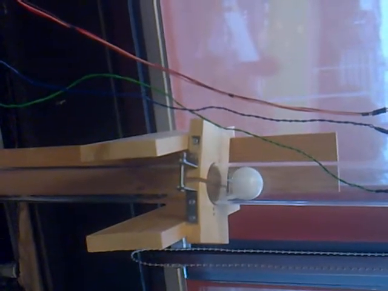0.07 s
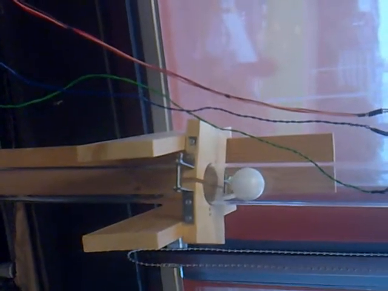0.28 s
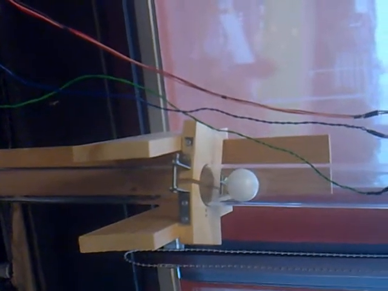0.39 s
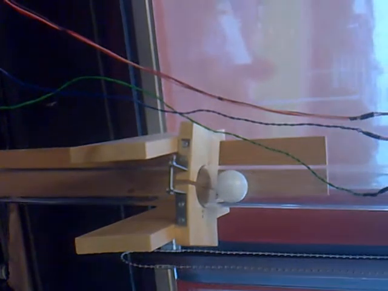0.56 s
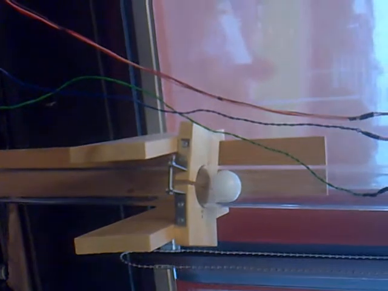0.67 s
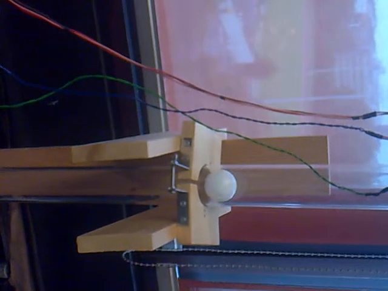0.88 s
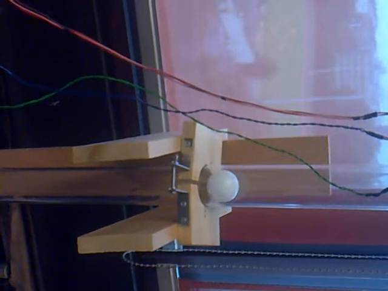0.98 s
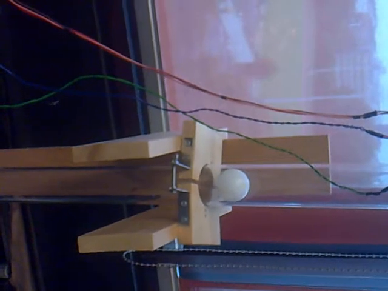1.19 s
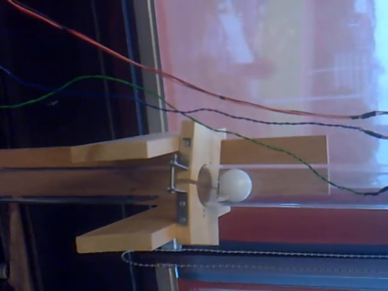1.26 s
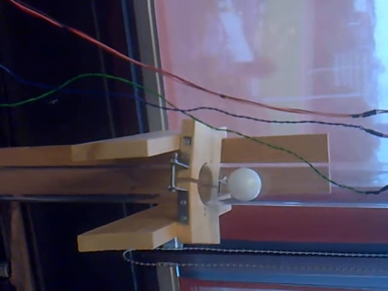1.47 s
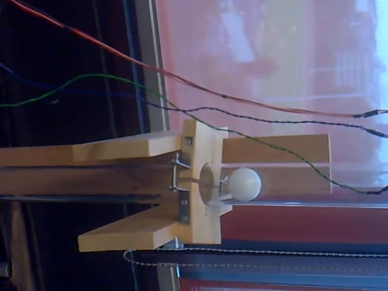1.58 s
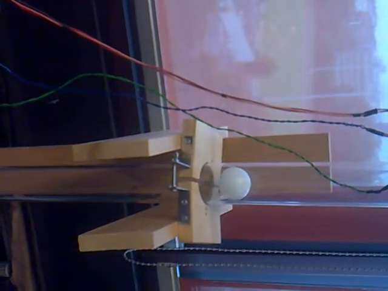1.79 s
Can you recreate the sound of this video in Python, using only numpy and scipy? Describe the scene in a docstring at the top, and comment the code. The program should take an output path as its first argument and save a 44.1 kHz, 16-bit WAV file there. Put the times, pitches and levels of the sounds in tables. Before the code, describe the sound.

Fading reverberation and faint quick ticks, then a strong rattling burst of hollow woody knocks, lighter taps, a second softer burst and two faint late taps; distant single microphone, reverberant room, low steady hiss.

```python
"""The dying reverberation of an earlier knock and a quick chatter come first, over a faint, drifting hiss.
A light hollow ball strikes a wooden end stop inside a tube, some way from the microphone.
Each knock is a short blow that excites damped modes of wood and ball; little of it arrives directly.
It swells into a live room of dense reflections and dies there, while filtered noise makes the hiss."""
import sys
import numpy as np
from scipy import signal
from scipy.io import wavfile
from scipy.ndimage import uniform_filter1d

SR = 44100
rng = np.random.default_rng(int(sys.argv[2]) if len(sys.argv) > 2 else 0)


def how_loud(loudness_db):
    """Turn decibels into a plain amplitude multiplier (0 dB gives 1, 20 dB gives 10)."""
    steps = np.asarray(loudness_db, float) / 20
    return 10 ** steps


def unload_wav(signal):
    """Save mono or channel-first audio to the path in sys.argv[1] as 16-bit WAV at rate SR, clipped to [-1, 1]."""
    wavfile.write(
        sys.argv[1],
        SR,
        np.round(np.clip(np.atleast_2d(signal).T, -1, 1) * 32767).astype(np.int16),
    )


N = 79380  # length [samples]


def unit_rms(x):
    """Normalization by the root mean square: scales to rms 1."""
    return x / np.sqrt(np.mean(x ** 2) + 1e-20)


def read_log_frequency(points, hz):
    """Linear interpolation of a spectral table on a logarithmic frequency axis."""
    table_hz, value = np.transpose(points)
    return np.interp(np.log(hz + 1), np.log(table_hz + 1), value)


def minimum_phase(gain_db, size=4096):
    """Minimum-phase principle: the Hilbert transform of log gain gives the most compact causal click."""
    log_gain = np.maximum(gain_db, -100) * np.log(10) / 20
    circle = np.concatenate([log_gain, log_gain[-2:0:-1]])
    phase = -signal.hilbert(circle).imag
    return np.fft.ifft(np.exp(circle + 1j * phase)).real[:size]


# Relative noise spectrum of the hiss: (frequency [Hz], spectral density [dB per Hz])
HISS_SPECTRUM = [(12, -18), (25, -7.5), (48, -2.5), (75, -13.5), (135, -2.5), (175, -11.5), (250, -10.5),
                 (310, -14.5), (335, -1), (365, -13.5), (420, -13.5), (585, -17.5), (850, -13.5),
                 (1600, -13.5), (2300, -17), (2800, -24.5), (4500, -27.5), (6000, -33), (9000, -35.5),
                 (11000, -36.5), (13500, -37), (15800, -35)]
# Slow drift of the hiss about its base level: (time [s], level change [dB])
HISS_DRIFT = [(0, 5.5), (.7, 0), (1.101, 3), (1.5, 1.5), (1.8, -3)]


def hiss():
    """Filtered Gaussian noise: air and electronics, with slightly uneven patches in time and frequency."""
    base_db, patch_spread_db = -54.5, 1.2
    frames, hz = N // 1024 + 5, np.fft.rfftfreq(4096, 1 / SR)
    real, imaginary, patches = rng.standard_normal((frames, 2049, 3)).T
    patches = uniform_filter1d(patches, size=40, axis=0)  # along frequency
    patches = unit_rms(uniform_filter1d(patches, size=3, axis=1))  # along time
    gain_db = read_log_frequency(HISS_SPECTRUM, hz)[:, None] + patch_spread_db * patches
    spectrum = (real + 1j * imaginary) * how_loud(gain_db)
    noise = signal.istft(spectrum, nperseg=4096, noverlap=3072)[1][:N]
    level_db = base_db + np.interp(np.arange(N) / SR, *np.transpose(HISS_DRIFT))
    return how_loud(level_db) * unit_rms(noise)


# Reverberation time of the room: (frequency [Hz], time to fall by 60 dB [s])
ROOM_DECAY = [(60, 0.41), (250, 0.37), (700, 0.39), (2000, 0.4), (5000, 0.36), (10000, 0.31), (15000, 0.3)]


def room(chance):
    """Diffuse reverberation: dense reflections build up, then decay exponentially at a rate set by frequency."""
    slot = 12  # one reflection in each slot [samples]
    mean_excess_db = 1.5  # reflection levels are spread exponentially, before normalization
    swell_s = 0.0046  # time constant of the build-up
    far_db, far_slower = -18.5, 1.7  # second tail from further off: initial level, factor on decay time
    near_db, near_t60_s = -13.5, 0.083  # first arrivals: energy relative to the tail, decay
    near_low_hz, near_high_hz = 700, 2700  # they come round the wood, without bass or treble

    starts = np.arange(0, SR - slot, slot)
    place, sign, size = chance[:3 * len(starts)].reshape(3, -1)
    taps, age = np.zeros(SR), np.arange(SR) / SR
    tap_at = starts + (place * slot).astype(int)
    taps[tap_at] = np.sign(sign - 0.5) * how_loud(-mean_excess_db * np.log(1 - size))
    taps = unit_rms(taps)

    hz, t, spectrum = signal.stft(taps, SR, nperseg=256)
    fall_db = -60 * t / read_log_frequency(ROOM_DECAY, hz)[:, None]
    decay = np.hypot(how_loud(fall_db), how_loud(far_db + fall_db / far_slower))  # the powers of both tails add
    tail = signal.istft(spectrum * decay, SR, nperseg=256)[1][:SR]
    tail = tail * (1 - np.exp(-age / swell_s))

    band = signal.butter(2, [near_low_hz, near_high_hz], "bandpass", fs=SR, output="sos")
    near = signal.sosfilt(band, taps[::-1] * how_loud(-60 * age / near_t60_s))
    return tail + how_loud(near_db) * np.linalg.norm(tail) * near / np.linalg.norm(near)


def ringing(modes, level_db, chance):
    """Modal superposition: damped cosines whose spectral peaks stand their level above a flat spectrum."""
    detune = 0.0093  # largest fractional shift: each blow lands elsewhere and shifts the modes a little
    t = np.arange(8192) / SR
    total = np.zeros(len(t))
    for (hz, db, t60), u in zip(modes, chance):
        unit_peak = 2 * np.log(1000) / (t60 * SR)
        envelope = how_loud(db + level_db - 60 * t / t60) * unit_peak
        total += envelope * np.cos(2 * np.pi * hz * (1 + detune * (2 * u - 1)) * t)
    return total


# Relative spectrum of the blow before each knock colours it: (frequency [Hz], spectral density [dB per Hz])
BLOW_SPECTRUM = [(24, -31), (50, -27), (120, -12), (200, -23), (300, -12.5), (520, -13.5), (700, -10),
                 (1000, -9), (1250, -8.5), (1600, -9), (2000, -6.5), (2400, -11), (2750, -14.5),
                 (3300, -17), (3900, -18), (5100, -23.5), (6000, -25), (8000, -31.5), (10500, -40.5),
                 (13000, -44), (15800, -54)]
# Modes of the wood, before detuning and each knock's offset:
# (frequency [Hz], level over the blow [dB], time to fall by 60 dB [s])
WOOD_MODES = [(207.9, 5, .15), (347.2, 5.5, 0.32), (387.4, -4.5, 0.11), (648.3, 0.5, 0.3), (881, -3.5, .1),
              (997, -3, 0.14), (1515, -9, 0.034)]
# Modes of the hollow ball, likewise: (frequency [Hz], level over the blow [dB], time to fall by 60 dB [s])
BALL_MODES = [(1763, -12.5, 0.019), (1922, -2, 0.1), (2100, -13.5, 0.026), (5020, -9.5, 0.005)]


def knock(thud_db, tick_db, wood_db, ball_db, chance):
    """Impulsive excitation: a short blow, duller or brighter, sets wood and ball ringing."""
    thud_hz, tick_hz = 590, 2730  # the thud lies below, the tick above
    hz = np.fft.rfftfreq(8192, 1 / SR)
    thud = thud_db / (1 + (hz / thud_hz) ** 4)
    tick = tick_db * (1 - 1 / (1 + (hz / tick_hz) ** 4))
    blow = minimum_phase(read_log_frequency(BLOW_SPECTRUM, hz) + thud + tick)
    modes = ringing(WOOD_MODES, wood_db, chance) + ringing(BALL_MODES, ball_db, chance[len(WOOD_MODES):])
    ring = signal.fftconvolve(blow, modes)[:8192]
    parts = np.array([np.pad(blow, (0, 4096)), ring])
    return parts / np.linalg.norm(parts.sum(axis=0))  # unit energy of blow plus ring


# Knocks of the ball on the stop: (time [s], strength before the room [dB], low thud [dB], bright tick [dB],
# offset of the wood modes [dB], offset of the ball modes [dB])
KNOCK_LIST = [(.038, -42.5, 18, 5, 2, -16), (.047, -39, 12.5, 8, -5.5, 8), (0.059, -35.5, 8.5, 4, 5, 1),
              (.075, -39, -20, -40, -16, -13), (.087, -33.5, -5.5, -4.5, -13, -17),
              (0.116, -37.5, 5.5, -0.5, 4, -1), (0.198, -32, 9.5, 8, -22, 13),
              (0.2047, -21, -11.5, -9.5, 1, 2), (.219, -17.5, 0.5, 7.5, 15.5, 19.5),
              (.229, -15, -11, 1, -3, 12.5), (.237, -14.5, 1, -0.5, 11.5, 5), (.246, -22.5, -3, 0, -3, 11),
              (.253, -22, 2.5, -5, 7.5, -6), (0.298, -25.5, 8, -4, -9, 8), (.363, -28, -4.5, 8, -6, -4),
              (.369, -28.5, 12, 3, -1, -16), (.377, -28, 13.5, 8, 2, -2), (0.389, -28, 5, -10.5, -24, 12.5),
              (.420, -41, -3, 0, -21, -6), (.526, -72, 6, 3, -3, 4), (.665, -58, -5, 1.5, -14, -4),
              (.853, -51, -4, 6, 22, 0), (0.863, -45, 3.5, 10.5, 16.5, 5), (0.8816, -37, 5, 3.5, -10, 11.5),
              (1.010, -51, -2, 3, 1, -6), (1.090, -54, 6, 5, 0, 2), (1.112, -52.5, -6, 2, -8, 3),
              (1.192, -47.5, 5, 9, 11, 9), (1.211, -30.5, 5, 16.5, 19, 3), (1.221, -26, -1.5, 2, -8, -4),
              (1.257, -31.5, -4, -11.5, 5.5, -11), (1.763, -44.5, 2.5, 6.5, 9, 0),
              (1.773, -39.5, 7, 0.5, -11, -2)]


def ball():
    """Convolution with the room: every knock starts from a slightly other place and has its own reflections."""
    earlier_s, earlier_db = 0.11, -31  # a knock this long before the start still rings in the room
    straight_db, ring_rise_s = -3.5, 0.0034  # part of the ringing is heard straight; its rise time constant
    lead = SR // 4  # space before the start for the earlier knock [samples]
    out = np.zeros(lead + N + 2 * SR)
    knocks = [(-earlier_s, earlier_db, 0, 0, 0, 0)] + KNOCK_LIST
    for (s, db, *colour), chance in zip(knocks, rng.random((len(knocks), 12000))):
        blow, ring = knock(*colour, chance[::-1])
        reflections = room(chance)
        sound = signal.fftconvolve(blow + ring, reflections)
        rise = 1 - np.exp(-np.arange(len(ring)) / SR / ring_rise_s)
        sound[:len(ring)] += how_loud(straight_db) * np.linalg.norm(reflections) * rise * ring
        start = lead + round(s * SR)
        out[start:][:len(sound)] += how_loud(db) * sound
    return out[lead:lead + N]


def scene():
    """Linear superposition of ball and hiss in one channel."""
    return (ball() + hiss())[None]


def low_pass(x):
    """Removes everything above the highest recorded frequency."""
    return signal.sosfilt(signal.butter(12, 15890, fs=SR, output="sos"), x)


def record(dry):
    """Single-channel capture: the finished mix loses everything above the end of the treble through a steep
    low-pass, without further gain."""
    return low_pass(dry)


dry = scene()
out = record(dry)
unload_wav(out)
```